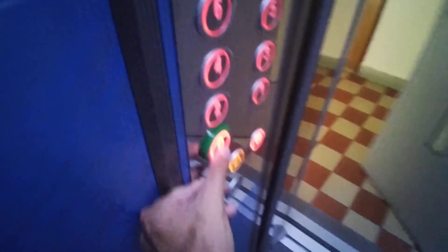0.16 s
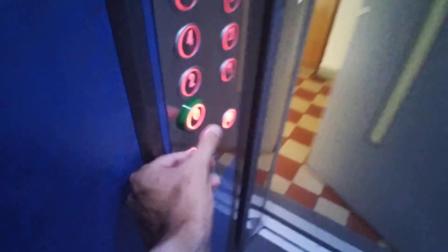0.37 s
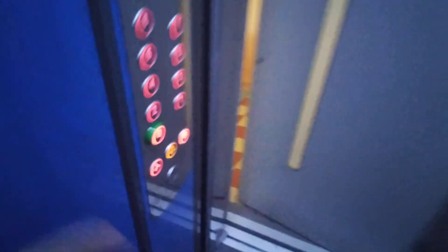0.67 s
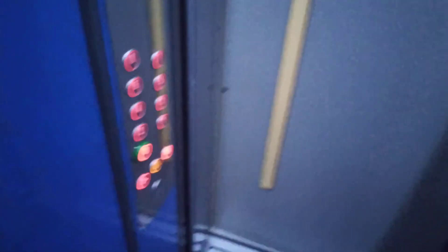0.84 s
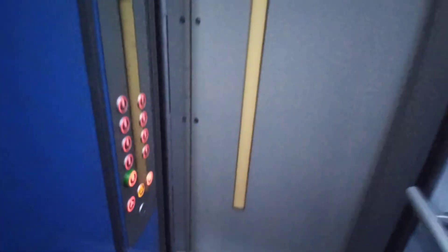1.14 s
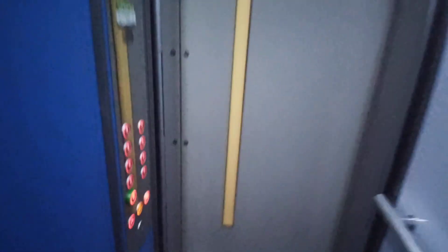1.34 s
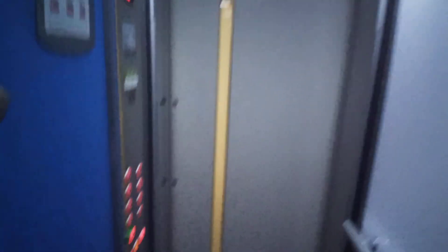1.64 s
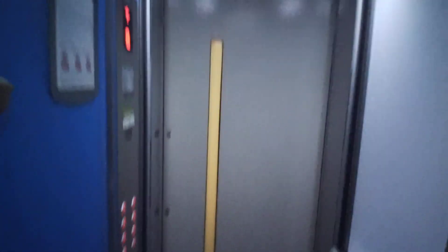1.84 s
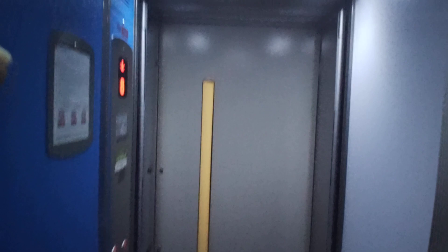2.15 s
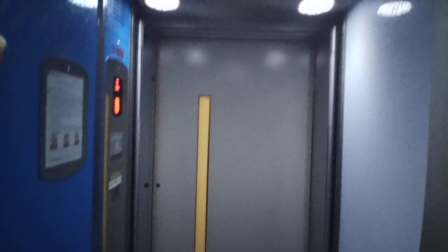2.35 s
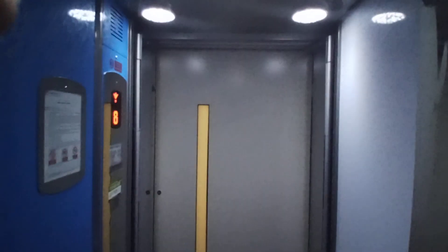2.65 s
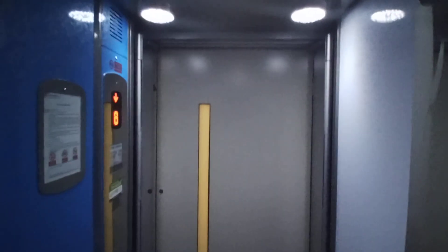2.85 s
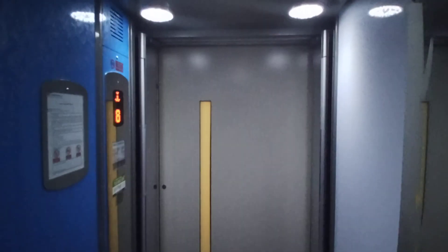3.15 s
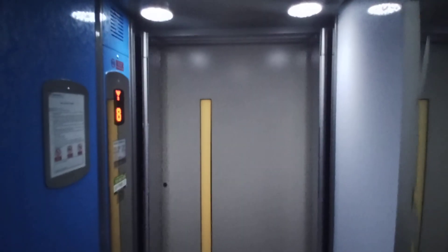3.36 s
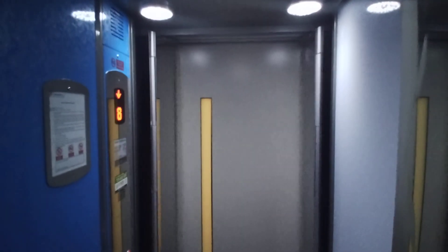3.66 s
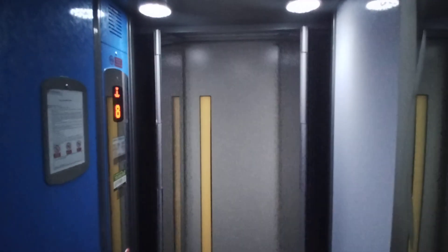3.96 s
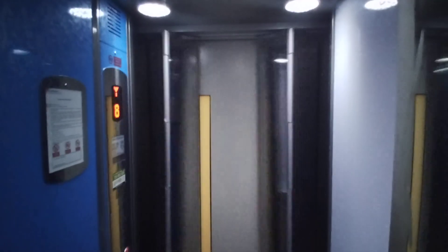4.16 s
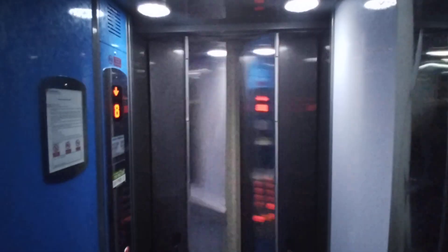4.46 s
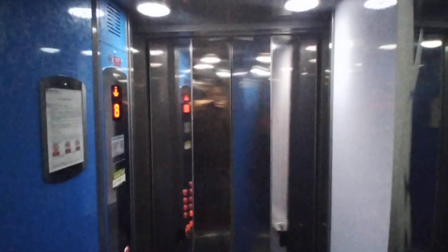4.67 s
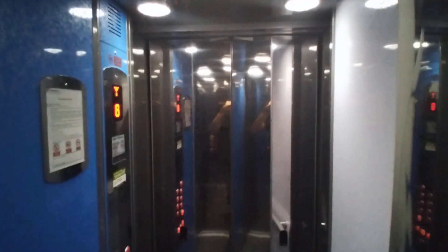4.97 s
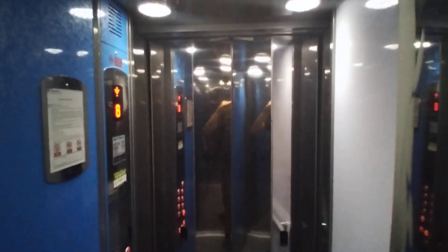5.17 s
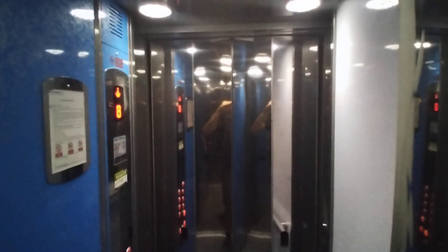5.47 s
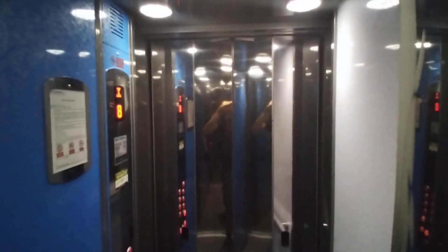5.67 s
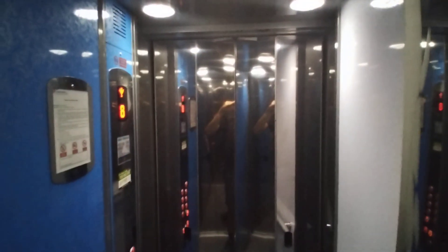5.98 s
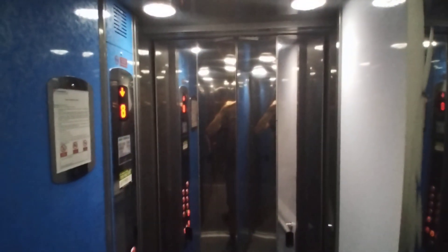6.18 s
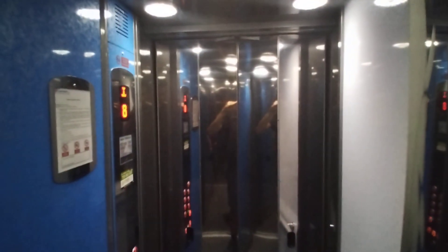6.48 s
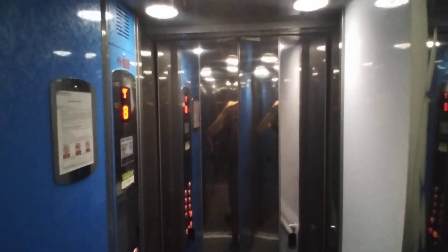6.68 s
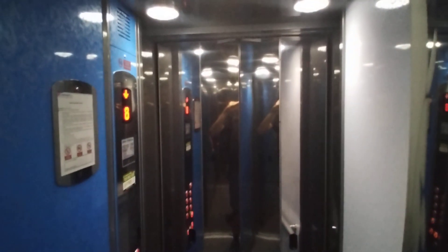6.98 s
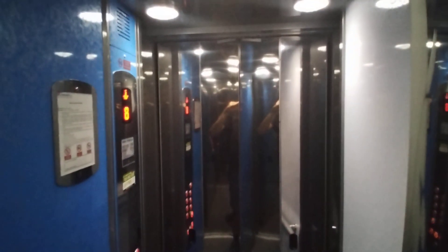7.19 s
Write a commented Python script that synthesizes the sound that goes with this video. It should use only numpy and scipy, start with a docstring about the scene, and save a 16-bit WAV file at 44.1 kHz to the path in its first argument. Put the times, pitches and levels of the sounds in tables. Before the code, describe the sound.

Close inside a small steel lift car, faint rustling and a knock precede a heavy booming door slam with crashing sheet metal. Short squeaks and knocks follow as the walls shiver. Latches clink, the car doors rumble and clatter along their track, meet with a clack, and a lock drops. After a lull, a low hoist hum rises, a relay ticks sharply and the car jolts softly.

```python
"""A hinged landing door slams, rattles and squeaks inside a small steel lift car; latches clink, the car doors
roll, brake with clattering knocks and meet, a lock drops, a hum rises, a relay ticks and the car jolts softly.
Struck parts are decaying sines or filtered noise bursts; the squeak is a stack of gliding harmonics.
Rolling, sliding, swaying and droning are shaped noise whose levels follow door speed, motor, hoist and shocks."""
import sys
import numpy as np
from scipy import signal
from scipy.fft import rfft, irfft, next_fast_len
from scipy.io import wavfile
from scipy.ndimage import uniform_filter1d

SR = 44100
rng = np.random.default_rng(int(sys.argv[2]) if len(sys.argv) > 2 else 0)


def wav_out(sig):
    """Save sig, one row per channel (or a flat mono array), as 16-bit PCM at SR to the path in sys.argv[1]."""
    wavfile.write(sys.argv[1], SR, np.round(np.clip(np.atleast_2d(sig).T, -1, 1) * 32767).astype(np.int16))


N = 322941
T = np.arange(N) / SR

# Landing door modes. Each row: frequency in Hz, relative level in dB, t60 in seconds.
LANDING_DOOR_MODES = [(139.8, -3, 0.33), (439, -25, 1.2), (647, -32, 1.3), (902, -13, 0.067),
                      (1827, -16, 0.15), (1960, -13.5, 0.11), (2100, -18, 0.052), (2350, -11.5, 0.039),
                      (2750, -32, 0.05)]
# Landing door hitting its frame. Each row: start in seconds, level in dB, contact time in ms.
SLAMS = [(.827, -3, 0.59), (.886, -11, 0.036)]
# Door leaf bouncing into its frame. Each row: start in seconds, level in dB.
BOUNCES = [(0.828, -7), (0.882, -7), (0.917, -8), (.957, -8), (.996, -18)]
BOOM_LOOSE_HZ, BOOM_SEATED_HZ, BOOM_SEATING_S, BOOM_T60_S = 186.4, 281.2, 0.1117, .15
# Spectrum of the door's loose sheet metal. Each row: frequency in Hz, relative level in dB.
CRASH_SPECTRUM = [(40, -2), (130, -3), (270, 13), (400, -3), (600, 9.5), (850, 1), (1100, 2), (1400, -9.5),
                  (2100, 1), (2900, -10), (3600, -19.5), (6000, -25.5), (10000, -35.5), (15000, -26)]
# Crashes of that metal. Each row: start in seconds, level in dB, brightness in dB per octave, ring time in seconds.
CRASHES = [(.826, -15.5, 0.54, 0.55), (.883, -13.5, 0.7, 0.15)]
# Door closer harmonics, lowest first. Each entry: relative level in dB.
SQUEAK_HARMONICS_DB = [0, -12, -9, -14, -18]
# Door closer notes. Each row: start in seconds, length in seconds, first pitch in Hz, last pitch in Hz,
# level in dB, brightness in dB per octave.
SQUEAKS = [(1.066, 0.026, 630, 680, -12.5, -5), (1.098, 0.018, 610, 620, -10, -7),
           (1.117, 0.034, 610, 600, -13, -5), (1.345, 0.07, 622, 664, -12.5, -0.5),
           (1.42, 0.023, 660, 662, -11.5, -3.5), (1.443, 0.045, 664, 668, -19, -6),
           (1.632, 0.04, 720, 762, -25, -6)]
SQUEAK_ATTACK_SHARE, SQUEAK_RELEASE_S = 0.7, 0.007
# Spectrum of the shaken walls' hum. Each row: frequency in Hz, relative level in dB.
SHAKE_SPECTRUM = [(50, -2), (100, -18), (150, -0.5), (200, -1.5), (270, -17), (400, -10.5), (800, -28),
                  (2000, -89)]
# Strongest wall resonances in that hum. Each row: centre in Hz, width in Hz, gain in dB.
SHAKE_PEAKS = [(200, 19, 4.3), (429, 15, 7)]
# The walls keep shaking after the slam.
SHAKE_S, SHAKE_RISE_S, SHAKE_T60_S, SHAKE_RATTLE_DB, SHAKE_DRONE_DB = 0.873, 0.17, 1.94, -16.5, -22
# Spectrum of soft brushing and puffing. Each row: frequency in Hz, relative level in dB.
SWISH_SPECTRUM = [(500, 3), (1400, 1.5), (2200, 4), (3200, 0), (4300, 2.5), (6000, -0.5), (8000, -3),
                  (11000, -23), (15000, -16.5)]
# Sleeves rustling, the landing door brushing shut, and a short puff as the hoist brake releases.
# Each row: start in seconds, length in seconds, level in dB.
SWISHES = [(0, 0.2, -44), (0.414, 0.33, -41), (0.692, 0.1, -30.5), (1.026, 1.56, -44), (6.857, 0.015, -33)]
SWISH_RISE_S, SWISH_T60_S = 0.037, 0.55

# Door arm modes. Each row: frequency in Hz, relative level in dB, t60 in seconds.
DOOR_ARM_MODES = [(501, 7.5, 0.14), (617, 8.5, 0.083), (715, 13.5, 0.031), (907, -6, 0.14)]
# Blows on the arm. Each row: start in seconds, level in dB, contact time in ms.
ARM_HITS = [(3.194, -33, .1), (3.21, -21, .1), (3.219, -26, 0.11), (4.151, -40, .1), (4.472, -35, 0.11)]
# Car door motion, joined by straight lines. Each row: time in seconds, share of full speed.
DOOR_SPEED = [(3.15, 0.46), (3.35, 0.15), (3.55, 0.74), (3.75, 0.95), (4.35, 0.96), (4.5, 0.85),
              (4.92, 0.43), (5.15, 0.057)]
# Levels at full speed, and the powers of speed by which they scale.
ROLLER_DB, ROLLER_POWER = -27.5, 0.74
SLIDE_DB, SLIDE_POWER = -31, 14.8
RUMBLE_DB, RUMBLE_POWER = -22.5, 0.55
DOOR_SWAY_DB = -35.5
# Spectrum of rollers and rattling panels. Each row: frequency in Hz, relative level in dB.
RATTLE_SPECTRUM = [(120, -37), (200, -22.5), (262, -2.5), (572, -9.5), (1120, -17), (1740, -23.5),
                   (3990, -36), (7800, -47), (9000, -73), (11700, -99)]
# Sheet-steel wall panels. Each row: centre in Hz, width in Hz, gain in dB.
PANEL_PEAKS = [(110, 6.6, 9), (268.9, 22, 12.5), (365, 17, 7), (483, 59, 4), (690.5, 7.6, 11), (819, 23, 6),
               (1115, 16, -12.5), (1300, 52, -2), (1800, 420, -3), (3850, 590, 5)]
# Spectrum of rollers grinding over rough track. Each row: frequency in Hz, relative level in dB.
BUMP_SPECTRUM = [(100, -5), (270, 2.5), (450, 2), (650, -13), (900, -6.5), (1300, -12.5), (2200, -21.5),
                 (4000, -22), (9000, -45)]
# Rough spots passed. Each row: start in seconds, level in dB, brightness in dB per octave, ring time in seconds.
BUMPS = [(3.326, -27, -1.2, 0.3), (3.716, -25, -0.2, 0.35), (3.95, -26, 1, 0.82),
         (4.149, -21.5, -0.4, 0.26), (4.235, -20, -4, 0.34), (4.279, -24, 1.5, 0.28),
         (4.467, -19.5, -1.1, 0.32), (4.601, -22.5, -3, 0.32)]
# Door panel modes. Each row: frequency in Hz, relative level in dB, t60 in seconds.
DOOR_PANEL_MODES = [(257, 1, 0.087), (301, -1.5, 0.14), (367, -3, 0.14)]
# Bumps that shake the door panel. Each row: start in seconds, level in dB, contact time in ms.
PANEL_THUDS = [(3.605, -21, 1), (4.284, -17.5, .8), (4.508, -14, .5), (4.749, -17, .8)]
# Spectrum of the door track's boom. Each row: frequency in Hz, relative level in dB.
TRACK_SPECTRUM = [(25, -32), (45, 0), (60, 13), (85, -19), (140, -0.5), (200, -20), (500, -54)]
# Spectrum of sliding contact. Each row: frequency in Hz, relative level in dB.
SLIDE_SPECTRUM = [(600, -68), (1500, 5.5), (2800, 3), (3900, 13.5), (4600, 4.5), (5500, 4), (8000, -8.5),
                  (12000, -37)]
# Scrapes of the swinging, settling landing door. Each row: start in seconds, length in seconds, level in dB.
SCRAPES = [(0.506, 0.11, -40.5), (1.571, 0.033, -34.5)]
SCRAPE_RISE_S, SCRAPE_T60_S = .015, 0.24
# Guide shoes catching in the sill. Each row: start in seconds, mean pitch in Hz, level in dB.
JUDDERS = [(3.95, 692, -22.5), (4.152, 879, -27), (4.468, 763, -27.5)]

# Knocks on door panels and frame, and a dull clunk just before the car jolts. Each row: start in seconds,
# level in dB before band offsets and gain, brightness in dB per octave,
# ring time in seconds before the band multipliers.
KNOCKS = [(0.367, -34.5, -4, 0.31), (1.054, -23, 0, 0.17), (1.098, -23.5, -4.5, 0.86), (1.149, -36, 2, 0.2),
          (1.308, -21, -2.6, 0.56), (1.637, -30.5, -3, 1), (2.857, -30.5, -3, 0.43),
          (3.135, -40, 2.5, 0.18), (3.193, -26.5, -1.5, 0.13), (3.206, -21.5, -2, 0.21),
          (4.507, -25.5, -2, 0.29), (4.699, -33, 0.1, 0.78), (4.94, -27, 0, 0.11), (4.979, -25, -3.5, 0.25),
          (6.904, -31.5, -2, 0.14)]
# Bare steel of latches and door edges clinking. Each row: start in seconds,
# level in dB before band offsets and gain, brightness in dB per octave.
CLINKS = [(1.733, -33.5, 0), (2.613, -29.5, -1), (2.807, -42.5, -4.5), (4.904, -24.5, -1.5),
          (5.075, -30.5, -1)]
# Bands of boom, body, clank and crack. Each entry: nominal centre in Hz.
BAND_CENTRES_HZ = [150, 600, 2300, 7500]
# Ring time of boom, body, clank and crack. Each entry: multiplier of the blow's ring time.
BAND_RING_RATIOS = [2.22, 1.43, 1.25, 1.2]
# Boom, body, clank and crack of a knock. Each entry: level offset in dB.
KNOCK_BANDS_DB = [-6, 1, 2, -3]
# The same bands of a steel clink. Each entry: level offset in dB.
CLINK_BANDS_DB = [-25, -4, 7, 3.5]
# The same bands of a tick or catch blow. Each entry: level offset in dB.
CATCH_BANDS_DB = [-15, 5.5, 7.5, -26]
CLINK_T60_S, CATCH_T60_S = 0.22, 0.17  # before the band multipliers
# Colour shared by these blows in the car. Each row: frequency in Hz, level in dB above a pink tilt.
CAR_SPECTRUM = [(70, -5), (110, -1), (280, -4.5), (450, 2.5), (680, 0.5), (1400, 1), (2100, 8), (3500, 0.5),
                (7000, 6), (10500, -4.5), (15000, 1.5)]

# Latch modes. Each row: frequency in Hz, relative level in dB, t60 in seconds.
LATCH_MODES = [(860, 7.5, 0.21), (925, -7, 0.072), (986, -6, 0.15), (2390, -3, 0.061), (2980, 0, 0.07),
               (3347, 8, 0.077)]
# Blows on the latch. Each row: start in seconds, level in dB, contact time in ms.
LATCH_HITS = [(2.609, -33, 0.087), (2.619, -26.5, 0.088)]
# Modes of the tick and the catches. Each row: frequency in Hz, relative level in dB, t60 in seconds.
CATCH_MODES = [(1076, 7, 0.032), (1630, 10, 0.028), (1780, -1, 0.057)]
# A faint handling tick, then sharp blows on the door catches. Each row: start in seconds, level in dB,
# contact time in ms.
CATCH_HITS = [(0.447, -49.5, .05), (3.394, -36, 0.049), (3.466, -33, 0.056)]
# Spectrum of the clacks. Each row: frequency in Hz, relative level in dB.
CLACK_SPECTRUM = [(150, -19), (700, -7), (1050, -0.5), (1700, 4.5), (2100, 6.5), (2600, -10), (3500, -5),
                  (4500, -4.5), (7500, -6), (10000, -19), (15000, -33)]
# Clacks as the coupler grips, as the doors meet and as the lock drops. Each row: start in seconds, level in dB,
# brightness in dB per octave, ring time in seconds.
CLACKS = [(2.805, -23, 1, 0.25), (4.847, -26.5, -9.5, 0.14), (4.928, -21, -2.5, 0.3),
          (5.369, -33, -12.5, 0.89)]
# Relay modes. Each row: frequency in Hz, relative level in dB, t60 in seconds.
RELAY_MODES = [(1560, -9.5, 0.037), (2450, -1, 0.012), (3530, 1, 0.018), (4280, -3.5, 0.013)]
# Relay ticks. Each row: start in seconds, level in dB, contact time in ms.
RELAY_HITS = [(6.78, -16.5, 0.044)]
# Lock modes. Each row: frequency in Hz, relative level in dB, t60 in seconds.
LOCK_MODES = [(275, 11, 0.19), (342, 7.5, 0.17), (420, 1.7, 0.14), (624, -6, 0.11), (1157, -8, 0.18),
              (1518, -7, 0.13)]
# Lock drops. Each row: start in seconds, level in dB, contact time in ms.
LOCK_HITS = [(5.37, -29, 0.89), (5.431, -33.5, 1)]
# Car floor modes. Each row: frequency in Hz, relative level in dB, t60 in seconds.
CAR_FLOOR_MODES = [(108.8, 3, 0.3), (137, -4.5, 0.14), (163.7, -2.5, 0.28)]
# Jolts of the floor. Each row: start in seconds, level in dB, contact time in ms.
JOLTS = [(1.602, -18, 2.5), (1.694, -25, 3.2), (2.879, -20.5, 1.1), (3.238, -20.5, 5.1), (3.571, -13, 5.5),
         (4.95, -11, 5.1), (6.361, -25, 1.5), (6.975, -8.5, 3.2)]

# The door motor fades out after its off time.
MOTOR_ON_S, MOTOR_RISE_S, MOTOR_OFF_S, MOTOR_T60_S, MOTOR_DB = 2.97, 0.17, 5.51, 1.36, -33.5
MOTOR_HUM_HZ, MOTOR_HUM_DB = 97.3, -33
# The hoist takes up the car and keeps running.
HOIST_ON_S, HOIST_RISE_S, HOIST_DB, GEAR_DB, HOIST_SWAY_DB = 6.464, 0.85, -26.5, -35, -26.5
HOIST_HUM_HZ, HOIST_HUM_DB = 102, -30
BRAKE_S, BRAKE_T60_S, BRAKE_DB = 6.35, 1.35, -29  # the car shudders as the brake lets go
# Heavy shoves that set the hanging car swaying. Each row: start in seconds, level in dB.
LURCHES = [(.83, -20), (1.08, -15.5), (1.588, -14), (6.782, -24.5)]
LURCH_RISE_S, LURCH_HOLD_S, LURCH_T60_S = 0.012, 0.036, 1.7
REST_SWAY_DB, REST_DRONE_DB = -47, -49
# Spectrum of the swaying car. Each row: frequency in Hz, relative level in dB.
SWAY_SPECTRUM = [(12, -17.5), (24, -5.5), (34, -2.5), (52, -2.5), (75, -20), (130, -27), (400, -100)]
# Spectrum of the droning car. Each row: frequency in Hz, relative level in dB.
DRONE_SPECTRUM = [(40, -4.5), (70, -6), (100, 5), (135, -4), (175, -3.5), (260, -10.5), (600, -37.5),
                  (2000, -100)]
# Standing waves of the air in the car. Each row: centre in Hz, width in Hz, gain in dB.
CAR_AIR_PEAKS = [(101.5, 21, 7.5), (163, 22, 4)]
# Spectrum of the running gear. Each row: frequency in Hz, relative level in dB.
TRAVEL_SPECTRUM = [(120, -7), (220, -15), (400, -4), (750, -11), (1500, -11), (2800, -9), (4200, -23),
                   (6500, -28), (8200, -17), (9500, -45)]
# Spectrum of background air and hiss. Each row: frequency in Hz, relative level in dB.
AIR_SPECTRUM = [(30, -25), (100, -47), (200, -15), (370, -9), (550, -4), (1000, -14.5), (1700, -14.5),
                (3700, -23.5), (6200, -20.5), (7700, -9.5), (9500, -29.5), (12000, -28.5), (14400, -13.5),
                (16000, -25)]
TOP_HZ = 15900


def undb(db):
    """Decibels to gain."""
    return 10 ** (np.asarray(db) / 20)


def unit(x):
    """Scale to rms 1."""
    return x / np.sqrt(np.mean(x ** 2) + 1e-20)


def curve(rows, axis=1):
    """One column of a table, joined by straight lines in time."""
    rows = np.array(rows)
    return np.interp(T, rows[:, 0], rows[:, axis])


def colour(x, points, panels=()):
    """Minimum-phase filter from a spectrum plus optional resonances; causal, so attacks stay sharp."""
    size = next_fast_len(x.shape[-1] + 8192) // 2 * 2
    f = np.arange(size // 2 + 1) * SR / size + 1
    hz, db = np.transpose(points)
    shape_db = np.interp(np.log(f), np.log(hz), db)
    for centre, width, peak_db in panels:
        shape_db = shape_db + peak_db / (1 + (2 * (f - centre) / width) ** 2)
    # Fold the cepstrum to its causal half.
    cepstrum = irfft(np.log(undb(shape_db)))
    cepstrum[1:size // 2] *= 2
    cepstrum[size // 2 + 1:] = 0
    response = np.exp(rfft(cepstrum))
    return irfft(rfft(x, size) * response, size)[..., :x.shape[-1]]


def spread(mid, side):
    """Two close microphones in a reflecting box: bass alike, treble largely unrelated."""
    side_spectrum = [(50, -26), (150, -16), (350, -11), (700, -8),
                     (1300, -1), (2600, -4), (5500, -3.5), (10000, -.5)]  # Hz, dB
    side = colour(side, side_spectrum)
    return np.array([mid + side, mid - side])


def noise(size):
    """Diffuse stereo noise."""
    return spread(*rng.standard_normal((2, size)))


def walk(rate_hz):
    """Random levels held 1 / rate_hz s and slewed twice; spread near 1."""
    k = int(SR / rate_hz)
    steps = np.repeat(rng.standard_normal(N // k + 1), k)
    return 1.3 * uniform_filter1d(uniform_filter1d(steps, k), k)[:N]


def fade(t, t60_s):
    """Exponential decay by 60 dB in t60_s, at least 5 ms."""
    return np.exp(-np.log(1000) * t / max(t60_s, .005))


def swell(start_s, rise_s, length_s, t60_s):
    """Linear attack, hold and exponential release; length_s includes the attack."""
    attack = np.clip((T - start_s) / max(rise_s, .002), 0, 1)
    return attack * fade(np.maximum(T - start_s - length_s, 0), t60_s)


def ring_out(build_s, hold_s, t60_s):
    """One second of a blow's envelope: it builds up, holds and dies."""
    t = T[:SR]
    return (1 - np.exp(-t / max(build_s, 1 / SR))) * fade(np.maximum(t - hold_s, 0), t60_s)


def together(*levels):
    """Unrelated causes add in power."""
    return np.sqrt(sum(level ** 2 for level in levels))


def add(out, s, x):
    """Mix x into out from time s."""
    i = max(int(s * SR), 0)
    out[..., i:i + x.shape[-1]] += x[..., :N - i]


def cabin(x, wet_db, t60_s=0.38):
    """Direct sound plus the dense reflections of the small car."""
    t = T[:SR]
    tail_spectrum = [(100, -3.5), (300, 4.5), (700, 9.5), (5000, 9.5), (14000, -14.0)]  # Hz, dB
    tail = colour(noise(SR), tail_spectrum) * fade(t, t60_s) * (t > .003)
    reflections = signal.fftconvolve(x[None], unit(tail) / np.sqrt(SR), axes=1)[:, :N]
    return x + undb(wet_db) * reflections


def ripple(depth_db, count=260):
    """The many narrow resonances that one spot on thin steel favours: rows of Hz, dB."""
    db = depth_db * rng.uniform(-1.6, 1.6, count) * np.minimum(1, 8 * np.hanning(count))
    level_db = db - 10 * np.log10(np.mean(undb(db) ** 2))  # mean power 1
    return np.column_stack([np.geomspace(400, 10000, count), level_db])


def struck(modes, blows, wet_db):
    """A part rings in its own modes, neighbours in opposite phase; a longer contact leaves the high ones quiet."""
    out, t = np.zeros(N), T[:SR]
    for s, db, contact_ms in blows:
        for k, (hz, mode_db, t60_s) in enumerate(modes):
            softness = 1 + (hz * contact_ms / 1000) ** 2
            gain = (-1) ** k * undb(db + mode_db) / softness
            add(out, s, gain * fade(t, t60_s) * np.sin(2 * np.pi * hz * t))
    return cabin(out, wet_db)


def clatter(points, blows, build_s, hold_s, ripple_db):
    """A loose part rings as noise under its own spectrum; every blow favours different resonances."""
    out = np.zeros((2, N))
    for s, db, bright, t60_s in blows:
        tilted = [(hz, level + bright * np.log2(hz)) for hz, level in points]
        ring = unit(colour(colour(noise(SR), tilted), ripple(ripple_db)))
        add(out, s, undb(db) * ring_out(build_s, hold_s, t60_s) * ring)
    return out


def rub(points):
    """Soft friction noise: patches, each with its own pitch, come and go."""
    patches = []
    for shift in (.93, 1.07):
        shifted = [(hz * shift, db) for hz, db in points]
        patches.append(colour(noise(N), shifted) * undb(2.2 * walk(25)))
    return unit(sum(patches))


def door_boom(build_s=0.0019, hold_s=0.017, wet_db=-7, lower_ratio=.81, lower_db=-7):
    """Two close landing door modes boom at each bounce, rising in pitch as the leaf presses into its frame."""
    since_s = np.maximum(T - BOUNCES[0][0], 0)
    hz = BOOM_SEATED_HZ + (BOOM_LOOSE_HZ - BOOM_SEATED_HZ) * np.exp(-since_s / BOOM_SEATING_S)
    size = np.zeros(N)
    for s, db in BOUNCES:
        add(size, s, undb(db) * ring_out(build_s, hold_s, BOOM_T60_S))
    phase = 2 * np.pi * np.cumsum(hz * (1 + .012 * walk(90))) / SR
    modes = np.sin(phase) + undb(lower_db) * np.sin(lower_ratio * phase)
    return cabin(size * modes, wet_db)


def landing_door_slam():
    """The leaf hits its frame: ringing modes, a boom and crashing sheet metal."""
    ringing = struck(LANDING_DOOR_MODES, SLAMS, wet_db=0.5)
    crash = clatter(CRASH_SPECTRUM, CRASHES, build_s=0.00086, hold_s=0.021, ripple_db=3.0)
    return ringing + door_boom() + crash


def squeak(wet_db=-9):
    """The door closer sticks and slips in short gliding notes, each with its own brightness."""
    jitter, flutter = 1 + .009 * walk(260), undb(2 * walk(120))
    out = np.zeros(N)
    for s, length_s, first_hz, last_hz, db, bright in SQUEAKS:
        t = T[T < length_s]
        hz = np.linspace(first_hz, last_hz, len(t)) * jitter[int(s * SR):][:len(t)]
        phase = 2 * np.pi * np.cumsum(hz) / SR
        attack = t / (SQUEAK_ATTACK_SHARE * length_s)
        release = (length_s - t) / SQUEAK_RELEASE_S
        shape = np.clip(np.minimum(attack, release), 0, 1)
        tone = sum(undb(part_db + bright * np.log2(k + 1)) * np.sin((k + 1) * phase)
                   for k, part_db in enumerate(SQUEAK_HARMONICS_DB))
        add(out, s, undb(db) * shape * tone)
    return cabin(out * flutter, wet_db)


def shaking(t60_s):
    """The walls take up the slam and slowly settle."""
    return swell(SHAKE_S, SHAKE_RISE_S, SHAKE_RISE_S, t60_s)


def wall_hum(t60_s=4.27):
    """The low resonances of the walls outlast their rattle."""
    return unit(colour(noise(N), SHAKE_SPECTRUM, SHAKE_PEAKS)) * undb(SHAKE_DRONE_DB) * shaking(t60_s)


def swishes():
    """Sleeves rustle and the closing landing door brushes softly; later the hoist brake releases with a puff."""
    levels = [undb(db) * swell(s, SWISH_RISE_S, length_s, SWISH_T60_S) for s, length_s, db in SWISHES]
    return rub(SWISH_SPECTRUM) * together(*levels)


def door_speed():
    """Share of full speed at which the car doors move; zero outside the table."""
    moving = (T > DOOR_SPEED[0][0]) * (T < DOOR_SPEED[-1][0])
    return np.maximum(curve(DOOR_SPEED), 0) * moving


def rollers(bump_t60_s=0.13, soft_s=0.0038):
    """Soft small bumps keep the panels rattling after the slam and while the doors roll."""
    bumps = (rng.random(N) < 70 / SR) * undb(1.2 * rng.standard_normal(N))  # about 70 per second
    bump = (1 - np.exp(-T[:SR] / soft_s)) * fade(T[:SR], bump_t60_s)
    energy = np.abs(signal.fftconvolve(bumps ** 2, bump ** 2)[:N])
    lumps = np.sqrt(energy / energy.mean() + 1)
    rattle = unit(colour(noise(N) * lumps, RATTLE_SPECTRUM, PANEL_PEAKS))
    after_slam = undb(SHAKE_RATTLE_DB) * shaking(SHAKE_T60_S)
    rolling = undb(ROLLER_DB) * door_speed() ** ROLLER_POWER
    return rattle * together(after_slam, rolling)


def track_bumps():
    """Rollers grind over rough spots in the track; some bumps also ring the door panel."""
    grinding = clatter(BUMP_SPECTRUM, BUMPS, build_s=0.0037, hold_s=0.027, ripple_db=5)
    return grinding + struck(DOOR_PANEL_MODES, PANEL_THUDS, wet_db=-1.0)


def track_rumble(rumble_db=-28, uneven_db=2):
    """The weight of the doors rolls unevenly along the track, which booms."""
    boom = unit(colour(noise(N), TRACK_SPECTRUM))
    return boom * undb(rumble_db + uneven_db * walk(7.6)) * door_speed() ** RUMBLE_POWER


def sliding():
    """The landing door scrapes briefly; the shoes of the car doors hiss in the sill near full speed."""
    scrapes = [undb(db) * swell(s, SCRAPE_RISE_S, length_s, SCRAPE_T60_S) for s, length_s, db in SCRAPES]
    return rub(SLIDE_SPECTRUM) * together(*scrapes, undb(SLIDE_DB) * door_speed() ** SLIDE_POWER)


def judders(build_s=0.017, hold_s=0.014, t60_s=0.17, wet_db=-4):
    """A guide shoe catches in the sill and judders briefly at a rough, unsteady pitch."""
    out = np.zeros(N)
    for s, hz, db in JUDDERS:
        phase = 2 * np.pi * np.cumsum(hz * (1 + .1 * walk(300)[:SR])) / SR
        add(out, s, undb(db) * ring_out(build_s, hold_s, t60_s) * np.sin(phase))
    return cabin(out, wet_db)


def knocks(build_s=0.00017, hold_s=0.024, gain_db=-2, ripple_db=4.0):
    """Noise part of knocks, clinks, tick and catches: four bands build up and die, each blow with own resonances."""
    out = np.zeros((2, N))
    edges_hz = np.sqrt(np.multiply(BAND_CENTRES_HZ[1:], BAND_CENTRES_HZ[:-1]))
    pink_tilted = [(hz, db - 10 * np.log10(hz)) for hz, db in CAR_SPECTRUM]
    field = colour(noise(N), pink_tilted, PANEL_PEAKS)
    bands = []
    for edge_hz in edges_hz:
        bands.append(signal.sosfilt(signal.butter(4, edge_hz, fs=SR, output="sos"), field))
        field = signal.sosfilt(signal.butter(4, edge_hz, "high", fs=SR, output="sos"), field)
    bands = [unit(band) for band in bands + [field]]
    octaves = np.log2(np.divide(BAND_CENTRES_HZ, BAND_CENTRES_HZ[1]))  # from the body band
    blows = [(s, db + bright * octaves + KNOCK_BANDS_DB, t60_s) for s, db, bright, t60_s in KNOCKS]
    blows += [(s, db + bright * octaves + CLINK_BANDS_DB, CLINK_T60_S) for s, db, bright in CLINKS]
    blows += [(s, np.add(db, CATCH_BANDS_DB), CATCH_T60_S) for s, db, _ in CATCH_HITS]
    starts = rng.integers(0, N - SR, len(blows))  # a random cut of the noise for each blow
    for (s, bands_db, t60_s), start in zip(blows, starts):
        blow = sum(undb(gain_db + db) * ring_out(build_s, hold_s, t60_s * ratio) * band[:, start:start + SR]
                   for band, db, ratio in zip(bands, bands_db, BAND_RING_RATIOS))
        add(out, s, colour(blow, ripple(ripple_db)))
    return out


def latches():
    """Latch, handling tick and catches ring in their modes; coupler, meeting doors and lock clack."""
    clacks = clatter(CLACK_SPECTRUM, CLACKS, build_s=0.00089, hold_s=0.032, ripple_db=0.0)
    latch = struck(LATCH_MODES, LATCH_HITS, wet_db=-9.0)
    return latch + struck(CATCH_MODES, CATCH_HITS, wet_db=-0.5) + clacks


def hum(hz):
    """A motor's clean tone at rms 1, wavering a little with its load."""
    phase = 2 * np.pi * np.cumsum(hz * (1 + .006 * walk(3))) / SR
    return unit(undb(walk(6)) * np.sin(phase))


def car_body():
    """The hanging car sways and drones as shoves, the rolling doors, their motor, brake and hoist shake it."""
    speed, hoist = door_speed(), np.clip((T - HOIST_ON_S) / HOIST_RISE_S, 0, 1)
    motor = swell(MOTOR_ON_S, MOTOR_RISE_S, MOTOR_OFF_S - MOTOR_ON_S, MOTOR_T60_S)
    brake = swell(BRAKE_S, LURCH_RISE_S, LURCH_RISE_S, BRAKE_T60_S)
    lurches = [undb(db) * swell(s, LURCH_RISE_S, LURCH_HOLD_S, LURCH_T60_S) for s, db in LURCHES]
    swaying = together(undb(REST_SWAY_DB), undb(DOOR_SWAY_DB) * speed, undb(HOIST_SWAY_DB) * hoist, *lurches)
    droning = together(undb(REST_DRONE_DB), undb(MOTOR_DB) * motor,
                       undb(RUMBLE_DB) * speed ** RUMBLE_POWER, undb(BRAKE_DB) * brake, undb(HOIST_DB) * hoist)
    sway = unit(colour(noise(N), SWAY_SPECTRUM)) * swaying
    drone = unit(colour(noise(N), DRONE_SPECTRUM, CAR_AIR_PEAKS)) * droning
    gear = unit(colour(noise(N), TRAVEL_SPECTRUM)) * undb(GEAR_DB) * hoist
    motor_hum = hum(MOTOR_HUM_HZ) * undb(MOTOR_HUM_DB) * motor
    hoist_hum = hum(HOIST_HUM_HZ) * undb(HOIST_HUM_DB) * hoist
    return sway + drone + gear + motor_hum + hoist_hum


def air(air_db=-45.5):
    """Faint steady air in the shaft, with a thin hiss on top."""
    return unit(colour(noise(N), AIR_SPECTRUM)) * undb(air_db)


def scene():
    """Sum of all sources, from the landing door to the background air."""
    landing_door = landing_door_slam() + squeak() + wall_hum()
    arm = struck(DOOR_ARM_MODES, ARM_HITS, wet_db=-6.5)
    car_doors = arm + rollers() + track_bumps() + track_rumble() + sliding() + judders()
    relay = struck(RELAY_MODES, RELAY_HITS, wet_db=-15.5)
    lock = struck(LOCK_MODES, LOCK_HITS, wet_db=-4)
    floor = struck(CAR_FLOOR_MODES, JOLTS, wet_db=-2)
    blows = knocks() + latches() + relay + lock + floor
    return landing_door + swishes() + car_doors + blows + car_body() + air()


def record(dry):
    """The microphone rounds the loudest peaks and the top is cut."""
    rounded = dry / (1 + dry ** 4) ** .25
    return signal.sosfilt(signal.ellip(10, .2, 80, TOP_HZ, fs=SR, output="sos"), rounded)


dry = scene()
out = record(dry)
wav_out(out)
```